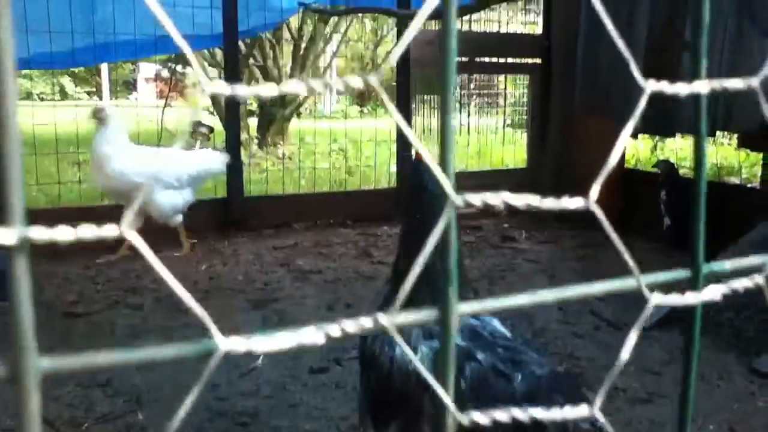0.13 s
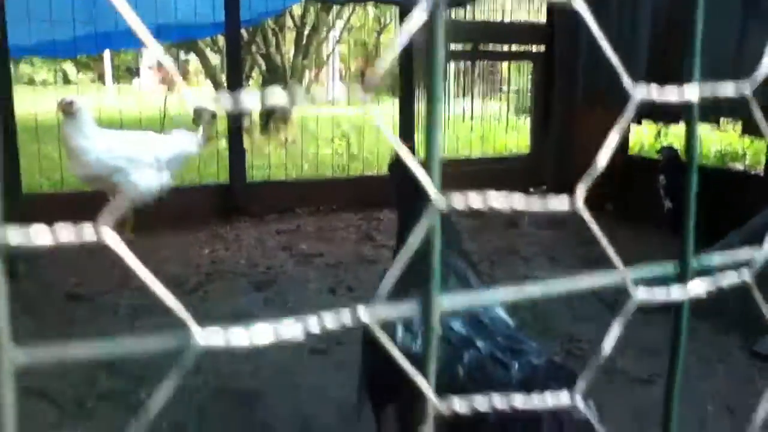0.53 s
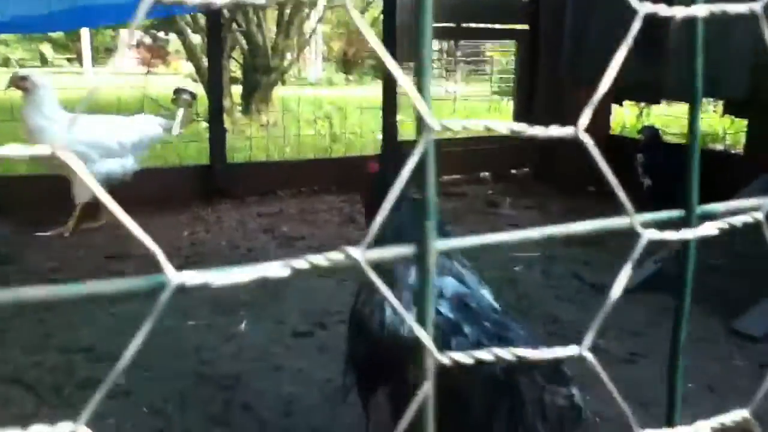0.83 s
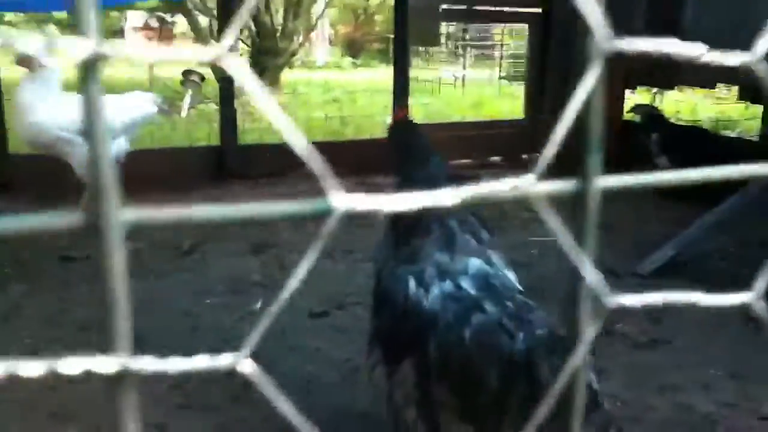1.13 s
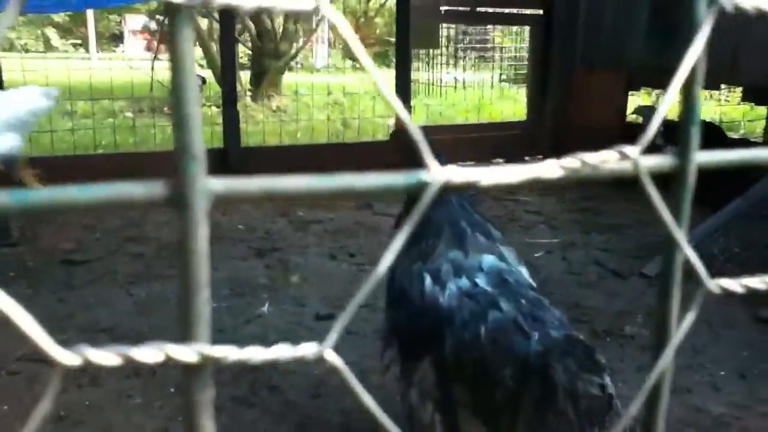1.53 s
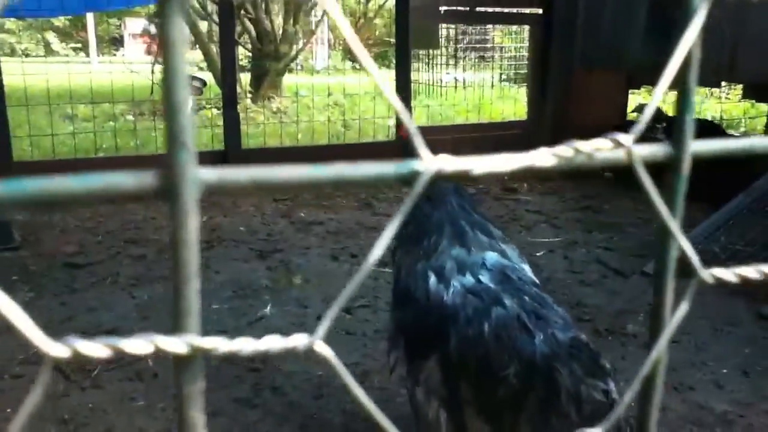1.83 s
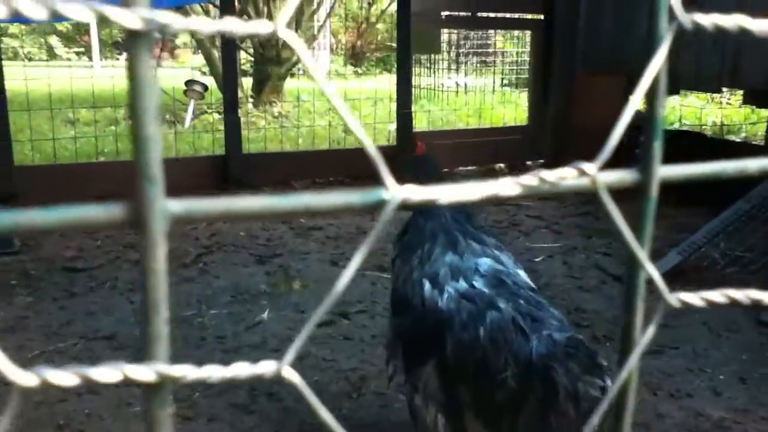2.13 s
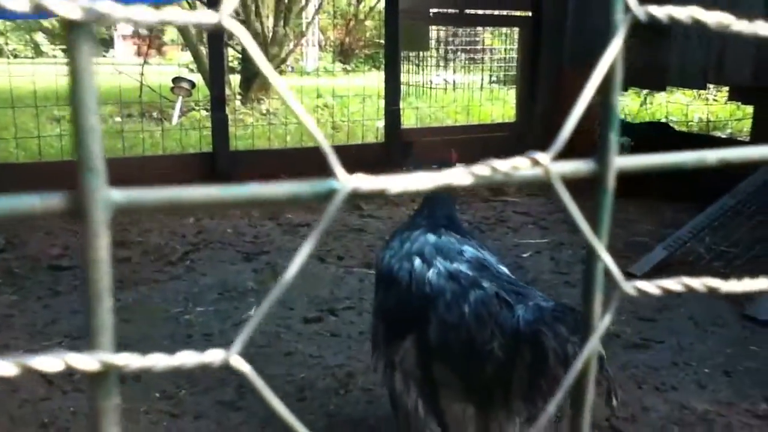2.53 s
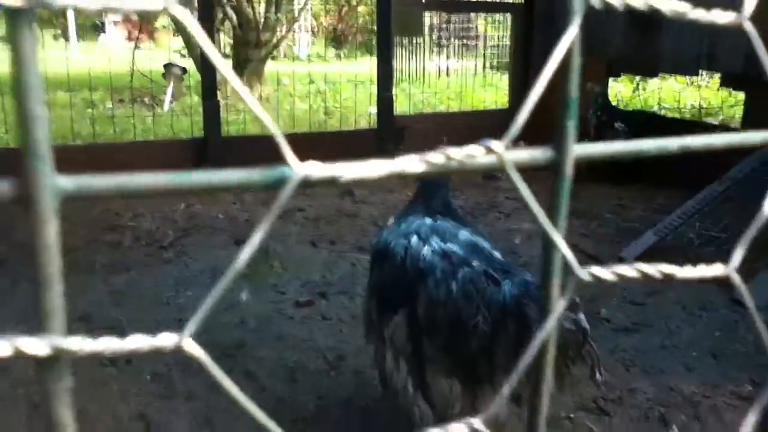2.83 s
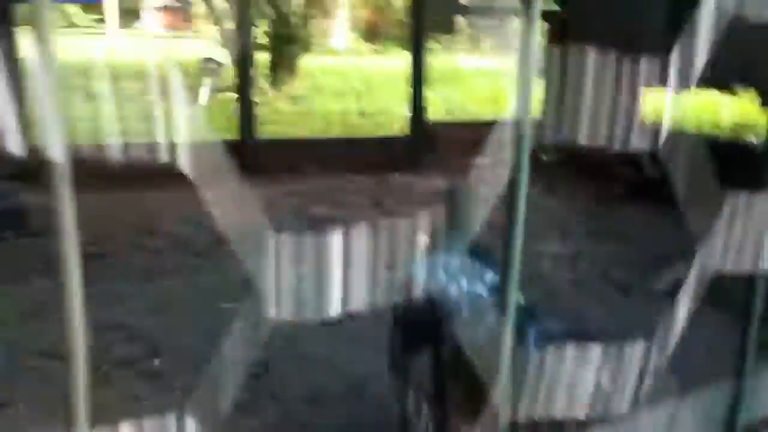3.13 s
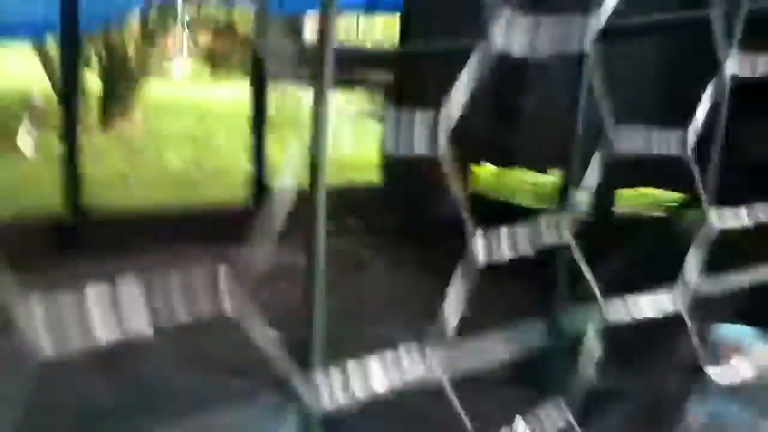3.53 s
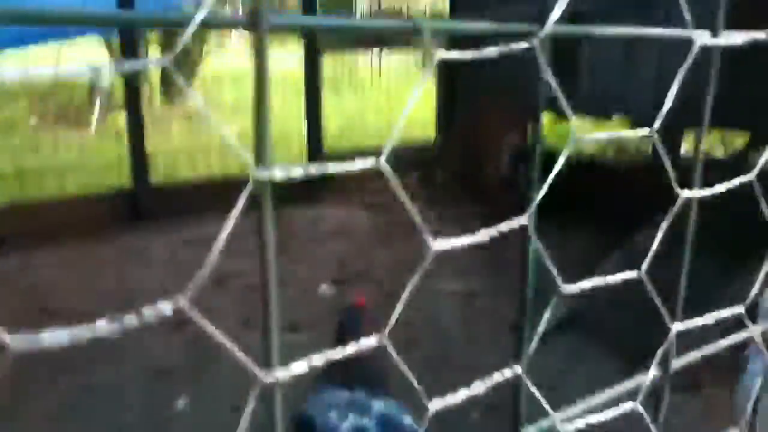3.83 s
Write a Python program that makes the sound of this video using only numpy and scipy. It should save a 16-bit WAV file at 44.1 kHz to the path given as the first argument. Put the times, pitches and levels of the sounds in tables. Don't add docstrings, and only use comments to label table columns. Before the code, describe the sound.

After a faint bump and tick, one loud rooster crow rises, holds and sinks to a short catch; quiet outdoor air follows, then increasingly heavy handling bumps and rubbing on the hand-held recorder.

```python
import sys
import numpy as np
from scipy import signal
from scipy.fft import rfft, irfft
from scipy.io import wavfile
from scipy.ndimage import uniform_filter1d, minimum_filter1d

SR = 44100
rng = np.random.default_rng(int(sys.argv[2]) if len(sys.argv) > 2 else 0)


def undo_db(level):
    steps = np.asarray(level, float) / 20
    return 10 ** steps


def store_wav(level_fs):
    pcm = np.round(np.clip(np.atleast_2d(level_fs), -1, 1) * 32767)
    wavfile.write(sys.argv[1], SR, pcm.T.astype(np.int16))


N = 176400


def at_hz(points, hz):
    table_hz, value = np.transpose(points)
    return np.interp(np.log(hz), np.log(table_hz), value)


def rms_one(x):
    return x / np.sqrt(np.mean(x ** 2) + 1e-20)


def drift(rate_hz):
    r = np.exp(-2 * np.pi * rate_hz / SR)
    wander = signal.lfilter([1], [1, -2 * r, r * r], rng.standard_normal(N + SR))
    return rms_one(wander[SR:])


def coloured(spectrum):
    hz = np.maximum(np.fft.rfftfreq(N, 1 / SR), 1)
    return rms_one(irfft(rfft(rng.standard_normal(N)) * undo_db(at_hz(spectrum, hz)), N))


def resonance(x, hz, width_hz):
    r = np.exp(-np.pi * width_hz / SR)
    poles = [1, -2 * r * np.cos(2 * np.pi * hz / SR), r * r]
    return signal.lfilter([(1 - r * r) / 2, 0, (r * r - 1) / 2], poles, x)


def add(out, start_s, piece):
    i = int(start_s * SR)
    out[i:i + len(piece)] += piece[:N - i]


def crow():
    # time_s, pitch_hz, windpipe_ring_db, throat_sac_db, beak_opening_db
    note_a = [(.918, 617, -61, -78, -70), (.94, 683, -39.5, -56.5, -56), (.952, 740, -49, -48.5, -47),
              (.974, 742, -33, -50.5, -62), (.99, 721.5, -43.5, -46, -47), (1.002, 679, -38.5, -54, -57),
              (1.024, 672, -47, -53, -51)]
    note_b = [(1.133, 620, -54, -53, -53), (1.149, 809, -40.5, -45, -52), (1.167, 828, -42.5, -45.5, -51),
              (1.192, 829.2, -45, -44, -38.5), (1.22, 821.4, -38.5, -46.5, -46.5),
              (1.237, 825, -48.5, -48, -56), (1.259, 829, -41, -52, -45), (1.284, 764, -34, -51.5, -54),
              (1.306, 589, -68, -70, -56)]
    note_c = [(1.338, 636.5, -78, -65, -80), (1.36, 786, -37.5, -47.5, -48.5),
              (1.382, 828.4, -43.5, -47, -45.5), (1.402, 820.6, -49.5, -47, -41),
              (1.419, 823.4, -47, -49, -41), (1.436, 806.4, -43.5, -50.5, -55),
              (1.459, 816, -49.5, -52, -57), (1.472, 804.3, -39.5, -49, -43.5),
              (1.514, 797.5, -34.5, -47, -42.5),
              (1.538, 784.4, -40.5, -52, -52), (1.555, 785, -48.5, -52.5, -65),
                   (1.622, 781.7, -42, -53, -46), (1.67, 778.2, -39, -56.5, -46.5),
                   (1.727, 775.3, -36, -58, -53), (1.8, 773.3, -36.5, -59, -54.5),
                   (1.907, 769.4, -35.5, -66, -58)]
    note_d = [(1.923, 768, -44.5, -52, -61), (1.929, 749.6, -31, -56, -49), (1.968, 748, -33, -45, -53),
              (2.019, 728.3, -52, -53, -52), (2.052, 702.4, -36, -61, -43), (2.078, 700.4, -35.5, -62, -49),
              (2.084, 721.4, -52.5, -57, -52), (2.103, 702, -34.5, -56.5, -43.5),
              (2.141, 617, -58.5, -72, -81)]
    # pitch_hz, level_db
    fundamental = [(600, -66), (690, -64.5), (730, -56), (785, -64), (800, -55.5), (835, -47.5)]
    fourth = [(690, -62), (745, -57.5), (772, -65), (785, -69.5), (800, -62.5), (830, -54.5)]
    sixth = [(700, -72.5), (745, -62.5), (768, -52.5), (777, -58), (790, -68.5), (825, -59.5)]
    ceiling_db = -45
    low_shimmer = 0.64
    wobble, flutter = 1 + 0.00173 * drift(58.5), drift(164)
    shimmer_db = [4 * drift(10.6) for k in range(4)]
    out = np.zeros(N)
    for note, thin_db in ((note_a, -3), (note_b, 0), (note_c + note_d, 0)):
        time_s, *columns = np.transpose(note)
        i = np.arange(int(time_s[0] * SR), int(time_s[-1] * SR))
        hz, ring, sac, beak = [np.interp(i / SR, time_s, column) for column in columns]
        glide = uniform_filter1d(np.abs(np.gradient(np.log(hz))) * SR, size=400)
        unsteady = wobble[i] + 0.004 * glide * flutter[i]
        phase = 2 * np.pi * np.cumsum(hz * unsteady) / SR
        waver = [db[i] for db in shimmer_db]
        sac_push = 0.084 * (sac + 53)
        levels = [
            sac_push + at_hz(fundamental, hz) + thin_db,
            sac,
            ring,
            sac_push + at_hz(fourth, hz) + low_shimmer * waver[0],
            beak,
            at_hz(sixth, hz) + np.minimum(ring - ceiling_db, 0) + low_shimmer * waver[2],
        ]
        for k in range(7, 18):
            levels.append(np.minimum(ring, ceiling_db) + thin_db + lift(k * hz) + waver[k % 4])
        harmonics = sum(undo_db(db) * np.sin((k + 1) * phase + k * k) for k, db in enumerate(levels))
        edge = np.clip(np.minimum(i - i[0], i[-1] - i) / (0.002 * SR), 0, 1)
        out[i] += edge * np.sqrt(2) * harmonics
    return out


def lift(hz):
    # pitch_hz, width_hz, level_db
    upper = [(4800, 380, -20), (5190, 350, -24.5), (5860, 330, -26), (6910, 380, -23), (7400, 300, -23.5),
             (8100, 600, -25.5), (8540, 180, -25), (9380, 220, -24.5), (9630, 410, -22.5),
             (10740, 300, -29), (12600, 450, -28)]
    lifts = [-38 + 0 * hz]
    for f, width, db in upper:
        lifts.append(db - 20 * np.log10(1 + (2 * (hz - f) / width) ** 2))
    return np.max(lifts, axis=0)


def rasps():
    # start_s, length_s, level_db, first_pulse_rate_hz, last_pulse_rate_hz
    links = [
        (.93, 0.078, -57, 349, 340),
        (1.013, 0.061, -47, 590, 549.5),
        (1.049, 0.088, -52.5, 680, 438.4),
        (1.12, 0.042, -50.5, 485, 691),
        (1.266, 0.07, -53.5, 394.5, 292),
        (1.33, 0.035, -47.5, 301, 407.5),
    ]
    gulp = (2.124, .036, -50, 230, 180)
    # pitch_hz, width_hz, level_db
    open_throat = [(1450, 700, -2), (2250, 400, 0), (3400, 130, 3), (4200, 600, -19)]
    shut_throat = [(2220, 190, 3), (4000, 250, -16)]
    out = np.zeros(N)
    for row, throat in [(link, open_throat) for link in links] + [(gulp, shut_throat)]:
        start_s, length_s, db, first_hz, last_hz = row
        add(out, start_s, undo_db(db) * rasp(length_s, first_hz, last_hz, throat))
    return out


def rasp(length_s, first_hz, last_hz, throat):
    n = int(length_s * SR)
    rate = np.geomspace(first_hz, last_hz, n) * (1 + 0.035 * drift(120)[:n])
    turns = np.cumsum(rate) / SR
    pulses = np.diff(np.floor(turns), prepend=0) * 10
    source = pulses + 0.85 * rng.standard_normal(n)
    voiced = np.zeros(n)
    for k, (hz, width, db) in enumerate(throat):
        hollow = resonance(resonance(source, hz, width), hz, 2 * width)
        voiced += (-1) ** k * undo_db(db) * hollow
    return rms_one(voiced) * np.sin(np.pi * np.arange(n) / n)


def slide():
    # time_s, pitch_hz, level_db
    path = [(1.044, 2045, -72), (1.065, 1910, -61), (1.082, 1756, -62), (1.097, 1476, -63),
            (1.118, 1460, -54), (1.13, 1480, -57)]
    time_s, hz, db = np.transpose(path)
    t = np.arange(N) / SR
    pitch = np.interp(t, time_s, hz) * (1 + 0.012 * drift(145))
    level = undo_db(np.interp(t, time_s, db, left=-150, right=-150))
    return level * np.sqrt(2) * np.sin(2 * np.pi * np.cumsum(pitch) / SR)


def pen(x):
    t60_s, tail_db, cut_hz = 0.12, -18, 6000
    t = np.arange(SR // 3) / SR
    tail = rng.standard_normal(len(t)) * undo_db(-60 * t / t60_s) * (t > 0.004)
    tail = signal.sosfilt(signal.butter(2, cut_hz, fs=SR, output="sos"), tail)
    tail /= np.sqrt(np.sum(tail ** 2))
    return x + undo_db(tail_db) * signal.fftconvolve(x, tail)[:N]


def handling():
    return thumps() + knocks() + ticks() + rubbing()


def ringing(hz, cycles):
    t = np.arange(SR // 4) / SR * abs(hz) * 4 / cycles
    return np.sign(hz) * np.sin(np.pi * t * cycles / 2) * t * np.exp(1 - t)


def thumps():
    # start_s, peak_db, pitch_hz (minus: starts inward), ring_cycles
    pushes = [(0.294, -40.5, 112, 1.95), (0.872, -46.5, 105, 2.1), (1.593, -48.5, 88, 2.3),
              (2.809, -38, 95, 1.7), (2.879, -46.5, 89, 6), (3.183, -36, -100, 0.9),
              (3.473, -24.5, 214, 1.26), (3.488, -29.5, -130, 0.72), (3.522, -38, 200, .8),
              (3.747, -29.5, -170, 0.76), (3.57, -24, 239, 1.55), (3.587, -39, 195, 9.2),
              (3.635, -38.5, 170, 3.4), (3.711, -31.5, 107, 2.6), (3.764, -16, -72, 0.78),
              (3.779, -30, -115, 2.6), (3.9487, -23, 150, 0.6), (3.9695, -22.5, -81, 1.5)]
    out = np.zeros(N)
    for start_s, db, hz, cycles in pushes:
        add(out, start_s, undo_db(db) * ringing(hz, cycles))
    return out


def knocks():
    # start_s, peak_db, pitch_hz (minus: starts inward), ring_cycles
    hits = [(2.991, -29.5, 415, 1.27), (2.993, -30, 785, 5), (3.114, -38, 469, 0.89),
            (3.128, -45.5, 704, 3.2), (3.474, -39.5, 700, 0.84), (3.462, -51, 745, 3.7),
            (3.4902, -26.5, -520, 2.45), (3.531, -48, 1300, 5.4), (3.5505, -24, -520, 1.74),
            (3.555, -28.5, 336, 1.75), (3.578, -35, 593, 3.5), (3.581, -44, 1071, 9.4),
            (3.7447, -24, 600, 1.14), (3.767, -27, -260, 0.39), (3.7601, -16, 165, 0.58),
            (3.798, -39.5, 507, 2.8), (3.844, -35.5, 1700, 0.77), (3.928, -36, -520, 2),
            (3.9408, -42.5, -1200, 5.3), (3.9474, -29, -800, 2.9), (3.9845, -29.5, 648, 2.3),
            (3.993, -30.5, 750, 1.7)]
    # pitch_ratio, level_db
    modes = [(1.0, 2.5), (1.75, -15.5)]
    out = np.zeros(N)
    for start_s, db, hz, cycles in hits:
        for ratio, mode_db in modes:
            add(out, start_s, undo_db(db + mode_db) * ringing(hz * ratio, cycles * ratio))
    return out


def ticks():
    # start_s, peak_db, pitch_hz, t60_s (time to fall 60 dB)
    snaps = [(0.647, -49, 2900, 0.054), (3.1298, -31.5, 6550, 0.0051), (3.129, -45, 1900, 0.0067),
             (3.5045, -49, 2500, 0.005), (3.48, -52, 5000, .01), (3.523, -52, 4600, 0.038),
             (3.5453, -33, 6800, 0.0045), (3.549, -43, 2900, 0.011), (3.7981, -36, 4400, 0.0042),
             (3.7981, -38.5, 7100, 0.0064), (3.7592, -51, 2600, 0.0078), (3.947, -49.5, 3500, 0.018),
             (3.8223, -48.5, 4300, 0.085), (3.972, -42, 1960, 0.063), (3.96, -46, 4600, .04),
             (3.9985, -48, 2500, .01)]
    spread = 1.316
    out = np.zeros(N)
    t = np.arange(SR // 10) / SR
    for start_s, db, hz, t60_s in snaps:
        swell = np.minimum(t / (0.02 * t60_s), 1)
        burst = rng.standard_normal(len(t)) * undo_db(-60 * t / t60_s) * swell
        edges = [hz / spread, min(hz * spread, 0.4 * SR)]
        burst = signal.sosfilt(signal.butter(2, edges, "band", fs=SR, output="sos"), burst)
        add(out, start_s, undo_db(db) * burst / np.abs(burst).max())
    return out


def rubbing():
    # time_s, level_db
    grip = [(2.75, -63), (2.9, -67), (3.12, -57.5), (3.25, -63.5), (3.45, -62), (3.589, -41), (3.61, -79.5),
            (3.736, -52), (3.83, -51), (3.867, -39.5), (3.93, -49), (3.969, -50), (3.98, -29), (4.0, -45)]
    # pitch_hz, level_db
    rub_colour = [(60, 6), (150, 6.5), (300, 7.5), (700, -3.5), (1070, -13), (1500, -21), (2500, -43)]
    time_s, db = np.transpose(grip)
    level_db = np.interp(np.arange(N) / SR, time_s, db, left=-120)
    grain_db = 2 * drift(40)
    return undo_db(level_db + grain_db) * coloured(rub_colour)


def air():
    # pitch_hz, level_db
    air_colour = [(15, -38), (25, -6.5), (141, -1), (344, -6.5), (936, -17), (1290, -18), (1480, -19),
                  (9320, -23.5), (16000, -25)]
    noise = coloured(air_colour)
    breeze = signal.sosfiltfilt(signal.butter(1, 497, fs=SR, output="sos"), noise)
    hiss = noise - breeze
    return undo_db(-58.5) * (hiss + breeze * undo_db(3.5 * drift(8.2)))


def muted(x):
    # pitch_hz, level_db against the strong neighbour
    mute_under = [(1500, -60), (2700, -45), (4400, -27), (5500, -25), (7000, -20), (8500, -16.5),
                  (12000, -16)]
    reach, lag = 29, 3
    hz, _, z = signal.stft(x, SR, nperseg=1024, noverlap=768)
    db = 10 * np.log10(uniform_filter1d(np.abs(z) ** 2, size=3, axis=-2) + 1e-20)
    beside = -minimum_filter1d(-db, size=reach, axis=-2)
    before = np.roll(uniform_filter1d(db, size=reach, axis=-2), lag, axis=-1)
    near = np.maximum(beside, 10 + before)
    band = uniform_filter1d(-minimum_filter1d(-db, size=3, axis=-2), size=3, axis=-1)
    faint = band < near + at_hz(mute_under, hz + 1)[:, None]
    gain = uniform_filter1d(undo_db(-18 * faint), size=3, axis=-1)
    return signal.istft(z * gain, SR, nperseg=1024, noverlap=768)[1][..., :N]


def scene():
    bird = crow() + rasps() + slide()
    return (pen(bird) + handling() + air())[None]


def band_limit(x):
    return signal.sosfilt(signal.butter(12, 16250, fs=SR, output="sos"), x)


def record(dry):
    low_cut = signal.butter(2, 32, "high", fs=SR, output="sos")
    top_cut = signal.cheby2(16, 50, 15900, fs=SR, output="sos")
    heard = signal.sosfilt(np.vstack([low_cut, top_cut]), dry)
    return band_limit(muted(heard))


dry = scene()
out = record(dry)
store_wav(out)
```